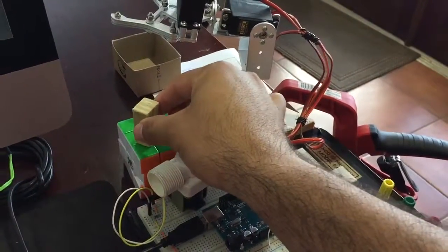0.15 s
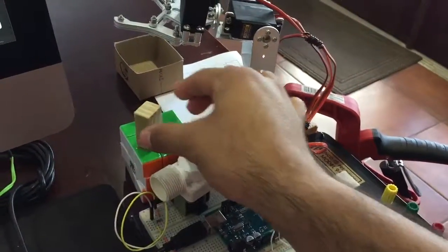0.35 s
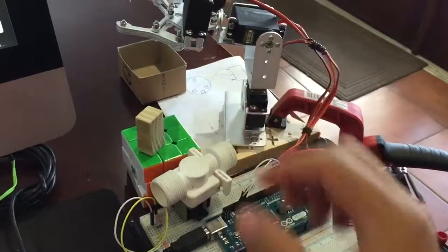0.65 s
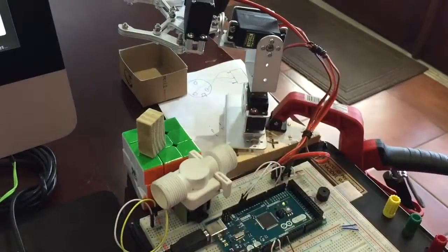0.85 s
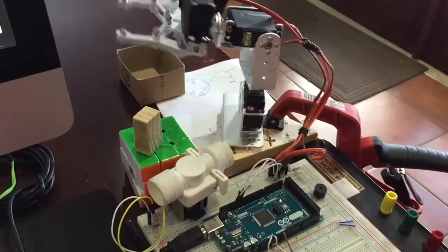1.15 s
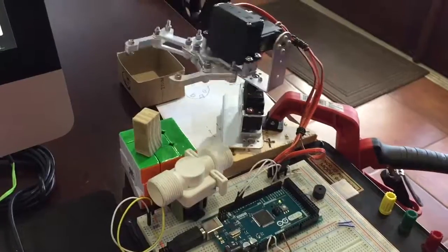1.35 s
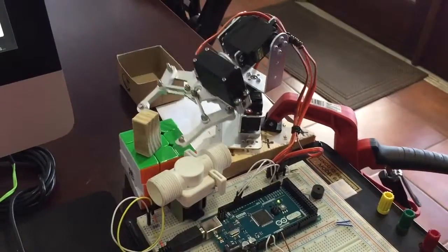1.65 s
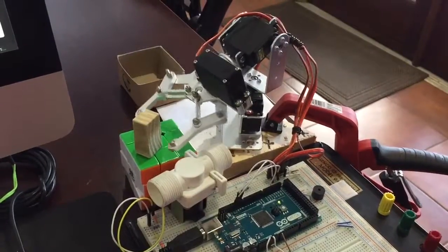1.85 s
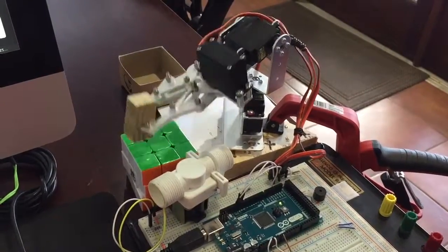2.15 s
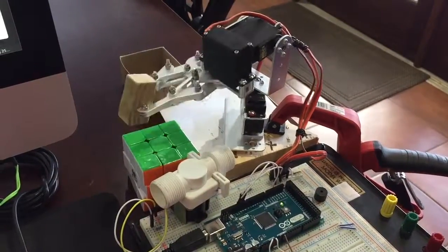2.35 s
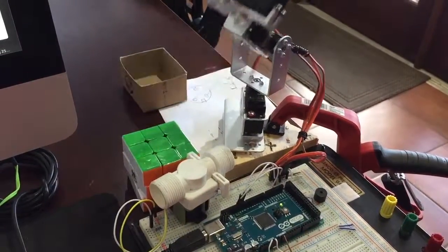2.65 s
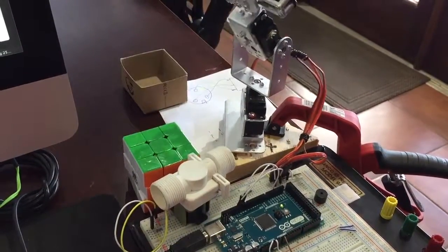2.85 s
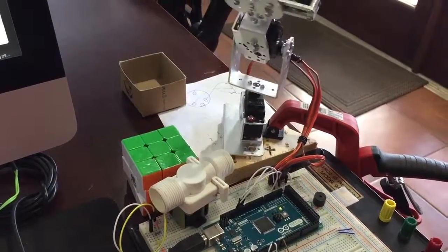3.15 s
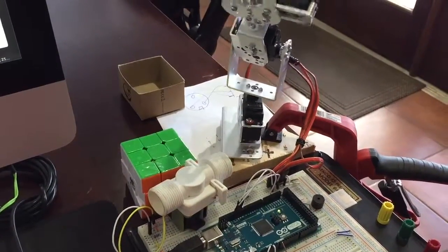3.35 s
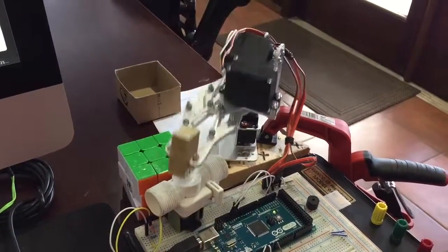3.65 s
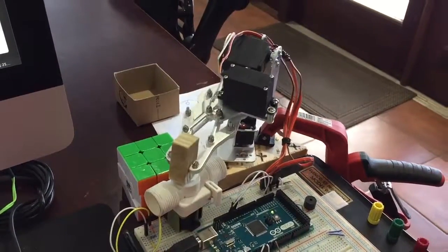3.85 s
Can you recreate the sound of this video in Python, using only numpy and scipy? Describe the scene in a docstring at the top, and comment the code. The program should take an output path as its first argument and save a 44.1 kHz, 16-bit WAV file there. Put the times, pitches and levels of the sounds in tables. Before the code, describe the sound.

Small hobby servos of a desktop robot arm whirr in short bursts, with faint taps and clicks.

```python
"""A wooden block is set down in a quiet, hard-floored room with a faint wavering appliance tone.
Soft table thuds and joint clicks follow, some among the short bursts of a desktop robot arm's hobby servos.
Block and thuds are fading sine waves; clicks and room tone are filtered noise.
Each motor spins up, hums at shaft speed, whines at gear-mesh multiples of it,
and rattles its gear train through the case; an echo tail of noise adds the room."""
import sys
import numpy as np
from scipy import signal
from scipy.fft import rfft, irfft
from scipy.io import wavfile
from scipy.ndimage import uniform_filter1d, map_coordinates

SR = 44100
rng = np.random.default_rng(int(sys.argv[2]) if len(sys.argv) > 2 else 0)


def attenuation_scalar(level_db):
    """Turn a level in dB into a linear amplitude multiplier (20 dB per decade)."""
    decades = np.asarray(level_db, float) / 20
    return 10 ** decades


def waveform_to_disk(signal):
    """Save audio, clipped to [-1, 1], as 16-bit WAV at the path in sys.argv[1]."""
    frames = np.transpose(np.atleast_2d(signal))
    scaled = np.clip(frames, -1, 1) * 32767
    samples = np.round(scaled).astype(np.int16)
    wavfile.write(sys.argv[1], SR, samples)


N = 176400  # length of the scene in samples

# Room tone, shape of its spectrum: (frequency [Hz], relative density [dB per Hz])
AIR_SPECTRUM = [(20, -34), (53, -3.5), (174, -6), (554, -14.5), (2250, -13), (2740, -19), (16000, -33)]
AIR_DB = -69.5  # typical rms level
# Wavering appliance tone: (frequency [Hz], typical rms level [dB])
APPLIANCE_TONES = [(589, -87)]
# How long the room's echo takes to fall by 60 dB: (frequency [Hz], time [s])
ROOM_DECAY = [(150, 0.66), (1000, 0.45), (5000, 0.81), (9000, 0.51), (15000, 0.32)]
ARM_ROOM_DB, TABLE_ROOM_DB = -9.5, -11.5  # echo relative to the direct sound

# Wooden block set down: (time [s], peak level [dB])
BLOCK_TAPS = [(.1125, -38)]
# Ringing tones of the block: (frequency [Hz], relative level [dB], time to fall 60 dB [s])
BLOCK_MODES = [(418, 7.5, 0.023), (652, 3, 0.019), (1030, -2, 0.039), (1883, 1, 0.022), (2780, -7, 0.014)]
# Table thuds: (time [s], peak level [dB], lower pitch [Hz])
TABLE_THUDS = [(0.46, -53.5, 172), (0.483, -52.5, 184), (2.106, -47, 402)]
THUD_CYCLES = 8.2  # cycles of the lower pitch until a thud is 60 dB down
# Joint clicks: (time [s], level before onset and decay [dB], centre [Hz], time to fall 60 dB [s],
# width [octaves])
JOINT_CLICKS = [(1.149, -56, 2440, 0.076, 0.94), (1.159, -42, 1670, 0.021, 0.63),
                (1.169, -48.5, 11600, 0.031, 0.28), (1.171, -51, 1940, 0.078, 1),
                (2.9356, -38, 13700, 0.017, .14), (3.478, -44.5, 2250, 0.08, .2)]

# One list of points per burst: (time [s], gear rattle level [dB], shaft hum level [dB])
BURST_LEVELS = [
    [(1.235, -49, -88), (1.29, -46, -52.5), (1.40, -50, -58), (1.455, -53.5, -73)],
    [(1.535, -60, -99), (1.582, -52.5, -48.5), (1.598, -34, -53.5), (1.745, -37, -49.5), (1.765, -55, -49)],
    [(1.88, -57, -79), (1.92, -48, -63.5), (2.0, -46.5, -45.5), (2.13, -45.5, -48), (2.165, -46, -73),
     (2.18, -60, -38)],
    [(2.185, -51.5, -53), (2.24, -36, -53), (2.31, -36, -53), (2.37, -48.5, -61)],
    [(2.48, -51, -93), (2.52, -35, -54), (2.59, -32.5, -48), (2.68, -34.5, -56.5), (2.79, -34, -47),
     (2.865, -45.5, -56.5)],
    [(3.12, -52.5, -98), (3.17, -45.5, -73), (3.215, -50.5, -47), (3.29, -59, -65), (3.31, -89, -49)],
    [(3.43, -67, -90), (3.48, -50.5, -63), (3.52, -47.5, -50), (3.548, -65, -63)],
    [(3.537, -37.5, -58), (3.575, -28.5, -50.5), (3.62, -34.5, -58), (3.67, -28.5, -59.5), (3.80, -37, -50),
     (3.82, -50, -52)],
]
# Each burst's motor: (servo index, time the spin-up counts from [s], nominal top shaft speed [Hz],
# spin-up time constant [s])
BURST_MOTORS = [(0, 1.232, 288, .033), (1, 1.52, 235, .02), (2, 1.85, 168, .045), (1, 2.203, 194, .017),
                (3, 2.478, 311, .046), (0, 3.117, 265, .031), (1, 3.43, 272, .03), (4, 3.52, 194, .015)]
# Each burst's voice: (whine relative to rattle [dB], share of rumble in the hum's power [0 to 1])
BURST_VOICES = [(-1.5, 1), (-21, 0.89), (-16, 0.0094), (-9, 0.1), (-8.5, 0.53), (-3, 0.077), (-5.5, 0.064),
                (-20.5, 0.94)]
EDGE_S = 0.0082  # fade at both ends of a burst
# One list per servo, its case and bracket: (frequency [Hz], relative density [dB per Hz])
SERVO_CASES = [
    [(773, -23), (1000, 1.5), (1210, -12), (1440, 2), (2100, -17), (2390, -4.5), (3500, -30), (4660, -33),
     (6800, -9.5), (7640, -26), (9300, -14), (10500, -66), (16000, -26)],
    [(400, -42.5), (831, -10), (1130, -19.5), (1930, -3), (3750, -14.5), (6140, -4.5), (8960, -2),
     (10700, -15), (13500, -12), (16000, -19)],
    [(640, -17.5), (1000, 0), (1340, -19.5), (1870, -3), (2630, 0), (3200, -11.5), (5800, -12),
     (6900, -1.5), (10400, -14), (16000, -6.5)],
    [(500, -71), (919, -14.5), (1210, -20.5), (1700, -6), (3200, -15.5), (3700, -19), (4470, -4.5),
     (5470, -12), (6100, -0.5), (6500, 1), (7000, -1), (8200, -3.5), (8830, 0.5), (10300, -13),
     (13500, -11), (16000, -20)],
    [(500, -26), (868, -11), (1320, -17.5), (1930, -7), (3200, -16.5), (5390, -11.5), (8300, -0.5),
     (10500, -16), (13600, -14), (16000, -22)],
]
# One list per servo, its gear-mesh whines: (multiple of shaft speed, relative level [dB])
GEAR_WHINES = [
    [(5, -2), (12, -5)],
    [(5, -5), (10, -2), (16, 6), (22, 1)],
    [(11, -1.5)],
    [(5, -5), (10, 1), (14, 2), (22, 5), (27, 5)],
    [],
]
# How well the case sounds a whine: (frequency [Hz], gain [dB])
CASE_GAIN = [(700, -16), (1400, 0), (2650, -1), (3200, -18), (4400, -13)]
# Unevenness of speed, one value per servo: (share of speed)
SPEED_FLUTTER = [.012, .022, .006, .003, .03]
# The arm shakes the table: (frequency [Hz], relative density [dB per Hz])
RUMBLE_SPECTRUM = [(45, -44), (80, -11.5), (240, -2.5), (330, -10.5), (450, -24.5)]
# The light servo's gears bite as they take up the load, one list per bite: (time [s], level [dB])
BITE_LEVELS = [
    [(1.215, -56.5), (1.247, -38.5), (1.268, -42.5), (1.285, -92)],
    [(3.12, -68), (3.15, -49.5), (3.2, -67)],
]
# Bright colour of the bites: (frequency [Hz], relative density [dB per Hz])
BITE_SPECTRUM = [(700, -57), (1030, 0.5), (1250, -4.5), (2400, -12.5), (3550, 3.5), (5350, -25.5),
                 (6970, 2.5), (7700, -11), (16000, -29.5)]
# Brief whines that swell and fade during a burst: (time the spin-up counts from [s], heard from [s],
# heard until [s], nominal top shaft speed [Hz], spin-up time constant [s], level [dB])
BRIEF_WHINES = [(1.235, 1.275, 1.345, 347, .03, -47.5), (3.13, 3.172, 3.225, 292, .025, -47),
                (3.52, 3.545, 3.62, 392, .012, -47)]

CREEP_PER_S = 0.15  # growth of shaft speed per second, as a share
BLUR_TURNS = 0.007  # fast unevenness of the shaft angle; it smears the upper whines
HUM_WAVER_DB, TONE_WAVER_DB = 1, 3.5
STEEP_MULTIPLE = 14  # whines above this grow steeply with speed, those below hardly
TEETH = 10  # tooth knocks per turn
TOOTH_SCATTER = 0.6  # uneven knock timing, in teeth
TOOTH_DB, TURN_DB, LUMP_DB = 3.5, 1, 1  # uneven knocks, swell once a turn, irregular swell
HIGH_TOOTH_DB = -8  # one tooth knocks harder on every turn
HISS_SHARE = 0.67  # brush hiss in the power of the knocks-and-hiss mix
RIPPLE_DB, FLEX_PER_S = 3.5, 30  # narrow peaks of the case; knots a second in their shift as the arm flexes


def unit(x):
    """Scale to rms 1."""
    return x / np.sqrt(np.mean(x ** 2) + 1e-20)


def along(points, hz):
    """Read between (Hz, value) points on a log frequency axis."""
    f, v = np.transpose(points)
    return np.interp(np.log(hz + 1), np.log(f + 1), v)


def wobble(rate, n):
    """A smooth random curve of n samples, with rate knots a second."""
    knots = rng.standard_normal(int(n * rate / SR) + 4)
    return map_coordinates(knots, [np.arange(n) * rate / SR])


def coloured(x, points, ripple_db=0):
    """Filter x to the (Hz, dB) points, roughened by narrow peaks; the filter never answers early."""
    m = 4096
    ripple = ripple_db * unit(uniform_filter1d(rng.standard_normal(m // 2 + 1), size=7))
    gain = attenuation_scalar(along(points, np.fft.rfftfreq(m, 1 / SR)) + ripple)
    # Folding the log spectrum's transform onto positive times gives a minimum-phase filter
    cepstrum = irfft(np.log(gain + 1e-6), m)
    cepstrum[1:m // 2] *= 2
    cepstrum[m // 2 + 1:] = 0
    response = irfft(np.exp(rfft(cepstrum)), m)
    return signal.fftconvolve(x, response)[:len(x)]


def add(track, s, x):
    """Mix x into track at time s."""
    part = track[round(s * SR):][:len(x)]
    part += x[:len(part)]


def burst(rows):
    """Time since the start, soft edges and one value per sample for each column after time."""
    s, *columns = np.transpose(rows)
    t = np.arange(round((s[-1] - s[0]) * SR)) / SR
    edges = np.clip(np.minimum(t, t[-1] - t) / EDGE_S, 0, 1)
    return t, edges, *[np.interp(t + s[0], s, c) for c in columns]


def air():
    """Room tone is filtered noise; the appliance tone is a sine of wavering strength."""
    t = np.arange(N) / SR
    tones = np.zeros(N)
    for hz, db in APPLIANCE_TONES:
        level = attenuation_scalar(db + 5.15 * wobble(11.0, N))
        tones += level * np.sqrt(2) * np.sin(2 * np.pi * hz * t)
    noise = unit(coloured(rng.standard_normal(N), AIR_SPECTRUM))
    return attenuation_scalar(AIR_DB + 0.48 * wobble(5.94, N)) * noise + tones


def room(x):
    """Echoes as a noise tail in which each frequency dies at its own speed."""
    hz, t, z = signal.stft(rng.standard_normal(SR), SR, nperseg=256)
    decay = attenuation_scalar(-60 * t / along(ROOM_DECAY, hz)[:, None])
    tail = signal.istft(z * decay, SR, nperseg=256)[1]
    delayed = np.pad(x, (300, 0))  # the echo starts 300 samples late
    return signal.fftconvolve(delayed, tail / np.linalg.norm(tail))[:N]


def blows(events, modes, attack_s):
    """Each blow rings a set of modes, sine waves that fade at their own speeds."""
    out, t = np.zeros(N), np.arange(SR // 4) / SR
    for s, db in events:
        ring = sum(attenuation_scalar(level - 60 * t / t60) * np.sin(2 * np.pi * hz * t) for hz, level, t60 in modes)
        ring = ring * (1 - np.exp(-t / attack_s))
        add(out, s, attenuation_scalar(db) * ring / np.abs(ring).max())
    return out


def table_thuds():
    """Each thud on the table rings two low tones that fade together."""
    out = np.zeros(N)
    for s, db, hz in TABLE_THUDS:
        t60 = THUD_CYCLES / hz
        out += blows([(s, db)], [(hz, 0, t60), (1.514 * hz, -6, t60)], attack_s=0.0027)
    return out


def wooden_block():
    """The block touches down and its wooden modes ring briefly."""
    return blows(BLOCK_TAPS, BLOCK_MODES, attack_s=0.00087)


def clicks():
    """Play in the joints is taken up: short fading noise bursts round one pitch."""
    out, t = np.zeros(N), np.arange(SR // 16) / SR
    for s, db, hz, t60, octaves in JOINT_CLICKS:
        band = [(hz * 2 ** (k * octaves), -15 * (abs(k) - 1)) for k in (-3, -1, 1, 3)]
        noise = unit(coloured(rng.standard_normal(len(t)), band))
        onset = 1 - np.exp(-t / 0.00067)
        add(out, s, attenuation_scalar(db - 60 * t / t60) * onset * noise)
    return out


def turning(t, top_hz, spin_s, flutter=SPEED_FLUTTER[0]):
    """Shaft turns so far of a motor that spins up, creeps faster and flutters a little."""
    spin_up = top_hz * (1 - np.exp(-t / spin_s))
    hz = spin_up * (1 + CREEP_PER_S * t + flutter * wobble(60, len(t)))
    return np.cumsum(hz) / SR


def tone(turns, order):
    """A wavering sine at a multiple of shaft speed, rms about 1; high multiples are smeared."""
    n = len(turns)
    waver_db = HUM_WAVER_DB if order == 1 else TONE_WAVER_DB
    level = np.sqrt(2) * attenuation_scalar(waver_db * wobble(44.0, n))
    cycles = order * (turns + BLUR_TURNS * wobble(300, n)) + rng.random()
    return level * np.sin(2 * np.pi * cycles)


def rattle(turns, case):
    """Uneven tooth knocks and brush hiss, swelling once a turn, shake the case."""
    n = len(turns)
    teeth_passed = np.floor(TEETH * turns + TOOTH_SCATTER * wobble(2500, n))
    hits = np.flatnonzero(np.diff(teeth_passed) > 0)
    strengths = attenuation_scalar(TOOTH_DB * rng.standard_normal(n)) * rng.choice([-1, 1], n)
    knocks = np.zeros(n)
    knocks[hits] = strengths[hits]
    drive = np.sqrt(1 - HISS_SHARE) * unit(knocks) + np.sqrt(HISS_SHARE) * rng.standard_normal(n)
    high_tooth = unit(np.diff(np.floor(turns), prepend=0))
    drive = drive + attenuation_scalar(HIGH_TOOTH_DB) * high_tooth
    drive = drive * attenuation_scalar(TURN_DB * np.cos(2 * np.pi * turns) + LUMP_DB * wobble(90.8, n))
    # Flexing moves the sound between two versions of the case with different narrow peaks
    flex = wobble(FLEX_PER_S, n)
    one = coloured(drive * np.cos(flex), case, RIPPLE_DB)
    other = coloured(drive * np.sin(flex), case, RIPPLE_DB)
    return unit(one + other)


def gear_whine(turns, hz, top_hz, servo):
    """Meshing gears sing at multiples of shaft speed; the case favours some pitches."""
    whine = np.zeros(len(turns))
    for multiple, db in GEAR_WHINES[servo]:
        speed_gain = (hz / top_hz) ** ((multiple / STEEP_MULTIPLE) ** 2)
        level = attenuation_scalar(db + along(CASE_GAIN, multiple * hz))
        whine += level * speed_gain * tone(turns, order=round(multiple))
    return whine


def shaft_hum(turns, hz, top_hz, rough):
    """The shaft hums with the square of its speed, mixed with the rumble of the shaken table."""
    shake = unit(coloured(rng.standard_normal(len(turns)), RUMBLE_SPECTRUM))
    pure = (hz / top_hz) ** 2 * tone(turns, order=1)
    return np.sqrt(1 - rough) * pure + np.sqrt(rough) * shake


def gear_bites():
    """The light servo's gears rattle brightly as they take up the load."""
    out = np.zeros(N)
    for rows in BITE_LEVELS:
        t, edges, db = burst(rows)
        turns = turning(t + 0.013, top_hz=280, spin_s=0.034)  # already 0.013 s into its spin-up
        add(out, rows[0][0], edges * attenuation_scalar(db) * rattle(turns, BITE_SPECTRUM))
    return out


def brief_whines():
    """Brief whines swell and fade during a burst, at five times a shaft speed that spins up."""
    out = np.zeros(N)
    for on, start, stop, top_hz, spin_s, db in BRIEF_WHINES:
        t = np.arange(round((stop - start) * SR)) / SR
        swell = np.sqrt(np.abs(np.sin(np.pi * t / t[-1])))
        turns = turning(t + start - on, top_hz, spin_s)
        add(out, start, attenuation_scalar(db) * swell * tone(turns, order=5))
    return out


def servos():
    """Each burst mixes one motor's rattle, whine and hum; bites and brief whines are added."""
    out = np.zeros(N)
    for rows, motor, (whine_db, rough) in zip(BURST_LEVELS, BURST_MOTORS, BURST_VOICES):
        servo, on, top_hz, spin_s = motor
        start = rows[0][0]
        t, edges, rattle_db, hum_db = burst(rows)
        since_on = np.abs(t + start - on)  # any time before spin-up is mirrored
        turns = turning(since_on, top_hz, spin_s, SPEED_FLUTTER[servo])
        hz = np.gradient(turns) * SR
        whine = gear_whine(turns, hz, top_hz, servo)
        gears = rattle(turns, SERVO_CASES[servo]) + attenuation_scalar(whine_db) * whine
        hum = shaft_hum(turns, hz, top_hz, rough)
        add(out, start, edges * (attenuation_scalar(rattle_db) * gears + attenuation_scalar(hum_db) * hum))
    return out + gear_bites() + brief_whines()


def scene():
    """Mix all sources, their echoes and the room tone into one channel."""
    table = wooden_block() + table_thuds()
    arm = clicks() + servos()
    echoes = room(attenuation_scalar(ARM_ROOM_DB) * arm + attenuation_scalar(TABLE_ROOM_DB) * table)
    return (arm + table + echoes + air())[None]


def low_pass(x):
    """Removes everything above the highest recorded frequency."""
    return signal.sosfilt(signal.butter(12, 15850, fs=SR, output="sos"), x)


def record(dry):
    """Turn the finished mix into the sound that is written out."""
    return low_pass(dry)


dry = scene()
out = record(dry)
waveform_to_disk(out)
```